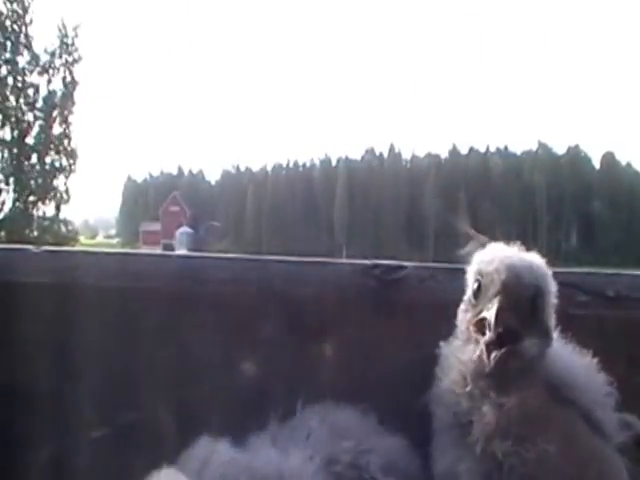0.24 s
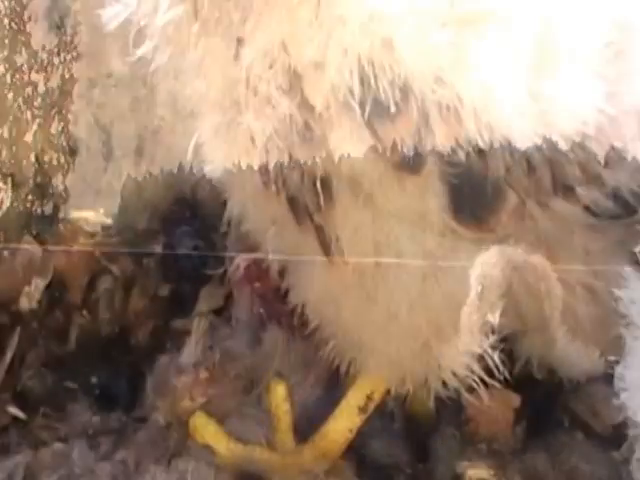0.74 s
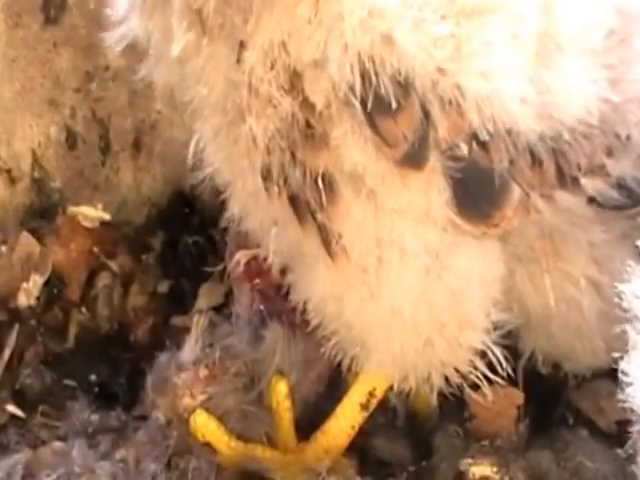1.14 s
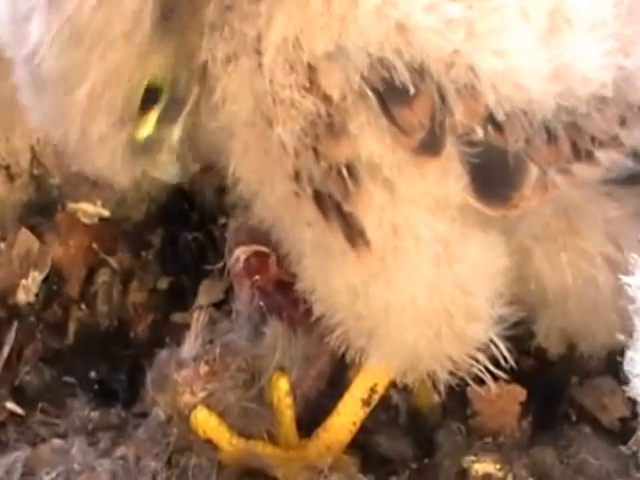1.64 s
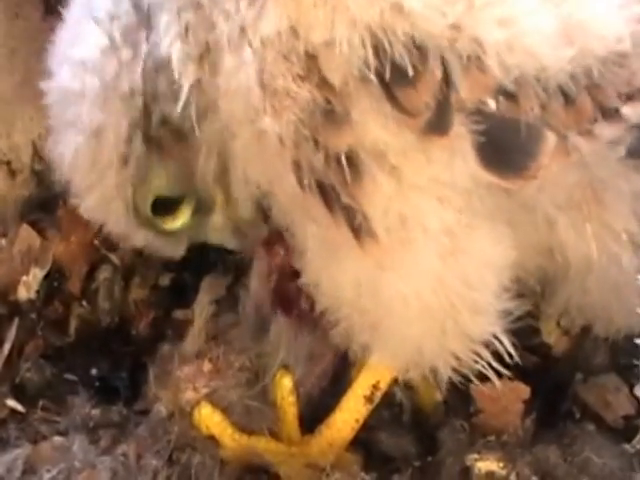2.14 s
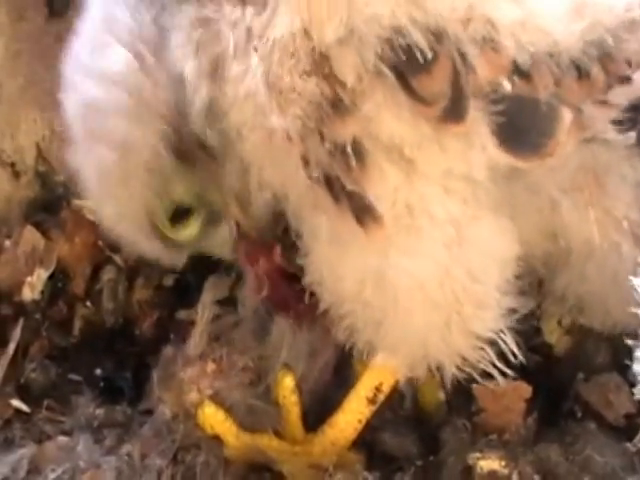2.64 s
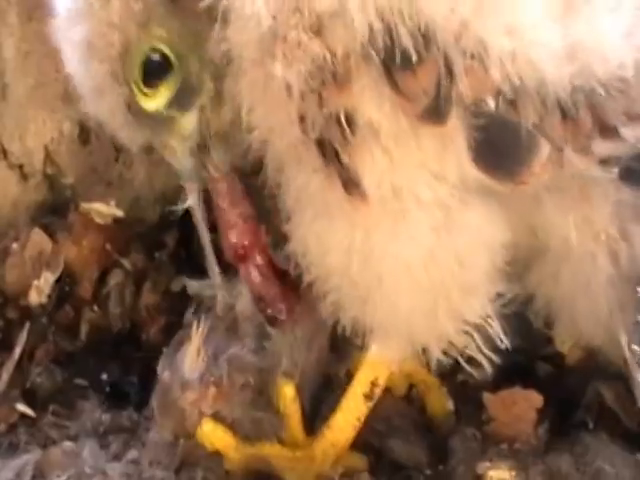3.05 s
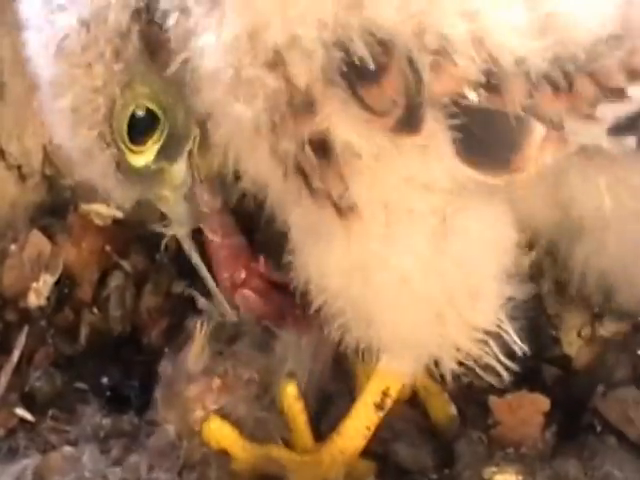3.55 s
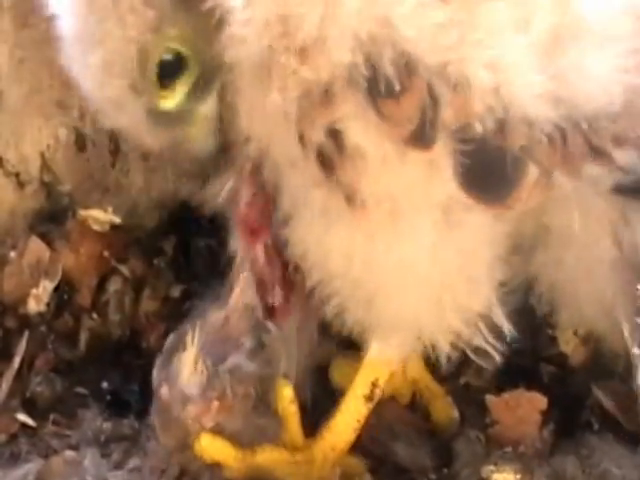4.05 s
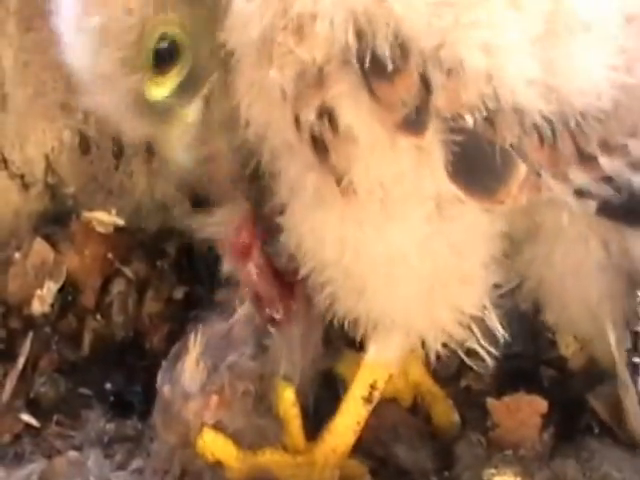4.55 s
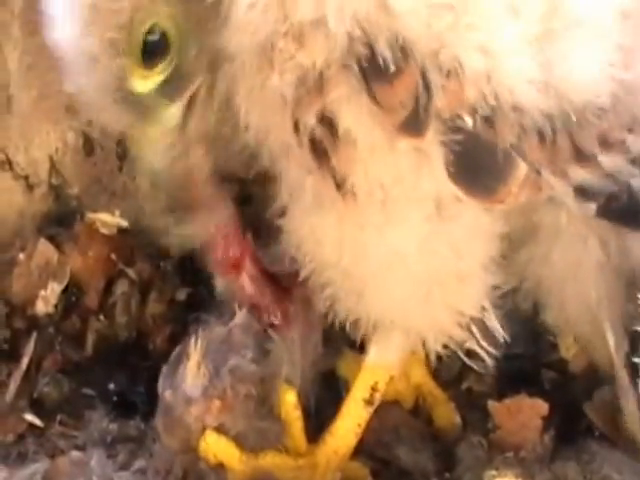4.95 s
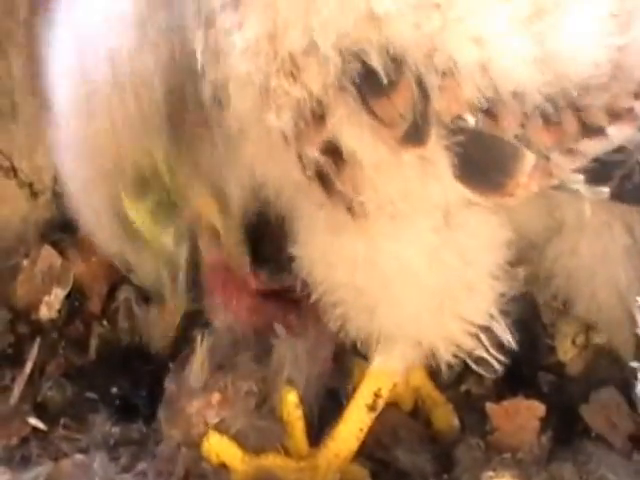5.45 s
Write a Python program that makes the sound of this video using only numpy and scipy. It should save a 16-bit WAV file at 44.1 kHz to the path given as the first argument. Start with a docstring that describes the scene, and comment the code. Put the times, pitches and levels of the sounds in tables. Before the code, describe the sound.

Piercing, wavering chick screams pile up, break and end in quick downward yelps, over faint board bumps and a low outdoor rumble.

```python
"""Kestrel chicks beg in a wooden nest box, close to a small camera, while one of them tears at prey.
Three harmonic voices overlap: cries rise, waver, roughen when forced, and may end in a plunging yelp.
Split-period partials and noise make their shared rasp; short wall echoes surround the voices.
Now and then feet bump the boards (damped modes) and litter scrapes (resonant grains).
Shaped noise makes a faint outdoor rumble."""
import sys
import numpy as np
from scipy import signal
from scipy.fft import rfft, irfft
from scipy.io import wavfile
from scipy.ndimage import uniform_filter1d

SR = 44100
rng = np.random.default_rng(int(sys.argv[2]) if len(sys.argv) > 2 else 0)


def dump(signal):
    """Clip the signal to [-1, 1] and save it as 16-bit WAV at the path in sys.argv[1]."""
    limited = np.clip(np.atleast_2d(signal).T, -1, 1)
    pcm = np.round(limited * 32767).astype(np.int16)
    wavfile.write(sys.argv[1], SR, pcm)


N = 251370
TIME = np.arange(N) / SR  # s


def undb(db):
    """Level to amplitude: 20 dB is a factor of ten."""
    return 10 ** (np.asarray(db) / 20)


def unit(x):
    """Normalisation to an rms of 1."""
    return x / np.sqrt(np.mean(x ** 2))


def gain_at(hz, points):
    """Frequency response: (Hz, dB) points joined on a logarithmic frequency axis."""
    point_hz, point_db = np.transpose(points)
    return undb(np.interp(np.log(hz + 1), np.log(point_hz), point_db))


def colour(x, points):
    """Linear filtering: multiply the spectrum by a response, then set the rms to 1."""
    response = gain_at(np.arange(N // 2 + 1) * SR / N, points)
    return unit(irfft(rfft(x) * response, N))


def noise(points):
    """Coloured noise: white noise through a frequency response."""
    return colour(rng.standard_normal(N), points)


def flutter(hz, size):
    """Random modulation: noise low-passed at hz, with a spread of about 1."""
    low_pass = signal.butter(2, hz, fs=SR, output="sos")
    motion = signal.sosfilt(low_pass, rng.standard_normal(size + SR // 2))
    return unit(motion[-size - SR // 4:])[-size:]  # the filter's start is dropped


def place(x, pan_db):
    """Stereo level difference: pan_db is left minus right."""
    return x * undb(np.array([[pan_db], [-pan_db]]) / 2)


# Spectrum of the outdoor background. Each row: frequency in Hz, relative level in dB.
OUTDOOR_SPECTRUM = [(25, -9.5), (65, 2), (120, 0), (190, -4), (330, -16), (700, -23), (1500, -25),
                    (6000, -24), (14000, -34.5)]
# Breeze outside the box, before its random swell. Each row: time in seconds, level in dB.
BREEZE_LEVEL = [(0, -51.5), (1.3, -55.5), (3.8, -51.5), (5.7, -51.5)]


def outdoors(side_db=2, swell_db=2):
    """Partial coherence: moving air rumbles unevenly, mostly unrelated at the two microphones."""
    mid = noise(OUTDOOR_SPECTRUM)
    side = undb(side_db) * noise(OUTDOOR_SPECTRUM)
    level_db = np.interp(TIME, *np.transpose(BREEZE_LEVEL)) + swell_db * flutter(5, N)
    return np.array([mid + side, mid - side]) * undb(level_db)


# Claws and beak in the litter.
# Each row: centre in seconds, length in seconds, level in dB before gain_db, resonance in Hz.
LITTER_STROKES = [(0.19, 0.03, -48, 330), (0.486, 0.059, -52, 925), (1.714, 0.026, -49, 370),
                  (4.242, 0.036, -46.5, 1150), (4.31, 0.08, -49, 330), (4.353, 0.12, -52, 1008),
                  (4.54, 0.035, -42.5, 400), (4.704, 0.26, -52, 392), (5.603, 0.14, -57.5, 706)]


def scrapes(grain=0.98, gain_db=-2):
    """Stick-slip friction: dry litter gives short, grainy strokes, each through one resonance."""
    out = 0
    for centre, length, db, hz in LITTER_STROKES:
        stroke = np.exp(-(2 * (TIME - centre) / length) ** 2)
        grains = rng.standard_normal(N) * np.exp(grain * flutter(154, N))
        resonance = signal.iirpeak(hz, 2.5, fs=SR)
        out = out + undb(db + gain_db) * stroke * unit(signal.lfilter(*resonance, grains))
    return out


# Modes of the floor boards.
# Each row: frequency in Hz, relative level in dB, time to decay by 60 dB in seconds.
BOARD_MODES = [(154, -5.5, 0.24), (187, 9, .12), (234, -22, 0.05), (352, -18, 0.02)]
# Feet and prey on the floor. Each row: start in seconds, peak level in dB before gain_db.
FLOOR_BUMPS = [(0.186, -29), (0.364, -31.5), (0.542, -26), (0.619, -31), (0.776, -34), (1.706, -34.5),
               (3.966, -29), (4.236, -29), (4.37, -30)]


def bumps(gain_db=-4.5, push_s=0.0046):
    """Modal ringing: a soft, scuffing push excites the damped modes of the boards."""
    t = TIME[:SR // 4]
    ring = sum(undb(db) * np.cos(2 * np.pi * hz * t) * undb(-60 * t / t60) for hz, db, t60 in BOARD_MODES)
    out = np.zeros(N + len(t))
    for s, db in FLOOR_BUMPS:
        push = np.exp(-t / push_s) * flutter(434, len(t))
        thud = signal.fftconvolve(push, ring)[:len(t)]
        start = int(s * SR)
        out[start:start + len(t)] += undb(db + gain_db) * thud / np.abs(thud).max()
    return out[:N]


def walls(x):
    """First reflections: the nearest boards answer at different delays at each microphone."""
    lags_s, loss_db = [(.00043, .0017), (.00084, .0024)], -17
    ears = [sum(np.pad(x, (int(lag * SR), 0))[:N] for lag in ear) for ear in lags_s]
    return undb(loss_db) * np.array(ears)


def box(x, t60=0.027, wet_db=-12):
    """Reverberation: close wooden walls give a dense, very short tail, different at each microphone."""
    t = TIME[:SR // 8]
    tails = rng.standard_normal((2, len(t))) * undb(-60 * t / t60) * (t > .001)
    return undb(wet_db) * np.array([signal.fftconvolve(x, h / np.linalg.norm(h))[:N] for h in tails])


def rasp_level(smooth_s=.008):
    """Energy summation: the rasp powers of all cries add; the result is in dB."""
    power = np.full(N, 1e-9)
    for cry in BEGGING_CRIES:
        span, _, db = gesture(*cry)
        power[span] += undb(db) ** 2
    return 10 * np.log10(uniform_filter1d(power, size=max(int(smooth_s * SR), 1)))


def croak(pitch_hz, jitter, effort):
    """Subharmonics: a strained syrinx's period splits in three, giving a ladder of wavering partials."""
    glide, rise, split_db, flicker_db = .03, .15, -4, 5
    # less pressure, lower pitch
    lift = 1 + rise * (uniform_filter1d(effort, size=4410) - 1)
    hz = pitch_hz * lift * (1 + glide * flutter(5, N) + jitter * flutter(330, N))
    phase = 2 * np.pi * np.cumsum(hz) / SR
    out = 0
    for k in range(4, 14):  # thirds of the pitch
        between_harmonics = k % 3 > 0
        db = split_db * between_harmonics + flicker_db * np.tanh(flutter(25, N))
        out = out + undb(db) * np.sin(k / 3 * phase + rng.uniform(0, 2 * np.pi))
    return unit(out)


# Colour of the screech. Each row: frequency in Hz, relative level in dB.
RASP_SPECTRUM = [(350, -27), (750, -10), (1450, -14.5), (2050, -1.5), (2750, 0.5), (3400, 2), (4100, 3.5),
                 (4800, -4.5), (5500, -2), (6300, 2), (7250, 3), (8900, -11), (11800, -19), (13800, -34)]


def screech(rattle_hz=380, rattle_depth=0.39, unevenness=.35):
    """Nonlinear phonation: the brood's reedy undervoice gains noise and rattle with effort."""
    forced_db, jitter, chaos = -30, .024, .42  # level of full effort; pitch shake and noise power there
    level_db = rasp_level()
    effort = np.clip(undb(level_db - forced_db), .2, 1)
    reeds = croak(2850, jitter * effort, effort) + croak(3300, jitter * effort, effort)
    voiced = colour(reeds, RASP_SPECTRUM)
    share = chaos * effort
    mixed = np.sqrt(1 - share) * voiced + np.sqrt(share) * noise(RASP_SPECTRUM)
    cycle = 2 * np.pi * np.cumsum(rattle_hz * (1 + unevenness * flutter(201.9, N))) / SR
    bursts = np.exp(effort * (rattle_depth * np.sin(cycle) + 0.19 * flutter(45, N)))
    return unit(mixed * bursts) * undb(level_db)


# A squeal: from top to low note, way up, hold, way back (s).
SWOOP_S, LEAP_S, NOTE_S, RECOVER_S = .038, .02, .008, .028
LEAP_DROP_DB, LEAP_ROUGH, NOTE_ROUGH = 4.5, .75, .12  # loss at the top; roughness at top and low note
BREAK_DB, BREAK_AT_S, BREAK_S = 7, .058, .01  # falter on the way up: loss, lead on the low note, width


def with_squeal(course, t, top_hz, low_hz, tone_db, over_db):
    """Register break: the voice falters, leaps to a rough top and swoops to a clear note at t = 0."""
    high = np.sin(np.pi / 2 * t / SWOOP_S) ** 2
    loss_db = LEAP_DROP_DB * high
    hz = low_hz + (top_hz - low_hz) * high
    rough = NOTE_ROUGH + (LEAP_ROUGH - NOTE_ROUGH) * high ** 2
    squeal = np.array([hz, tone_db - loss_db, over_db - loss_db, rough])
    share = np.interp(t, [-SWOOP_S - LEAP_S, -SWOOP_S, NOTE_S, NOTE_S + RECOVER_S], [0, 1, 1, 0])
    falter_db = BREAK_DB * np.exp(-((t + BREAK_AT_S) / BREAK_S) ** 2)
    return course + share * (squeal - course) - np.outer([0, 1, 1, 0], falter_db)


YELP_ATTACK, YELP_HOLD, YELP_FADE_DB = .6, .75, 9  # shares of the yelp's length; loss at its end
YELP_CRACK_DB, YELP_CRACK_AT, YELP_CRACK_WIDTH = 7, .3, .2  # early dip: loss, then shares of the length


def with_yelp(course, fall, final_hz, tone_db, over_db, rough=.22):
    """Tension release: the pitch plunges exponentially to final_hz as fall runs from 0 to 1."""
    hz = course[0] * (final_hz / course[0]) ** fall
    fade_db = YELP_FADE_DB * np.interp(fall, [YELP_HOLD, 1], [0, 1])
    yelp = np.array([tone_db - fade_db, over_db - fade_db, np.full(len(fall), rough)])
    crack_db = YELP_CRACK_DB * np.exp(-((fall - YELP_CRACK_AT) / YELP_CRACK_WIDTH) ** 2)
    share = np.minimum(fall / YELP_ATTACK, 1)
    strengths = course[1:] - np.outer([1, 1, 0], crack_db) + share * (yelp - course[1:])
    return np.vstack([hz, strengths])


ARCH = 2.2  # power of the arch that pitch and effort follow on both sides of the crest
SAG_DB, RASP_SAG_DB = 3, 3  # lost between crest and close
RASP_SWELL = .9  # share of a cry's swell that its rasp follows
SOFT_ROUGH = .5  # share of the roughness that is gone at the soft ends of a cry
YELP_RASP_DB = -10  # change of the rasp over the yelp
RELEASE_SHARE, RELEASE_DB = .22, 14  # a cry without a yelp fades over its last part
# Trembling of the voices. Each entry: voice, rate in Hz.
TREMBLE_HZ = {"shrill": 12.2, "low": 12, "whining": 10}
# Forced voices that break. Each row: voice, time of the low note in seconds, top pitch in Hz,
# low pitch in Hz, then tone and overtone levels in dB before the voice's gain.
VOICE_BREAKS = [("low", .285, 4130, 3520, -29, -34), ("low", .38, 4050, 3580, -31, -31),
                ("shrill", .452, 5050, 4400, -22.5, -42), ("shrill", .514, 5300, 3750, -28, -44),
                ("shrill", .6, 5400, 4200, -23, -36), ("shrill", .745, 4600, 3650, -23, -26),
                ("shrill", 1.345, 4950, 4400, -25, -44), ("shrill", 1.706, 4750, 4350, -23, -46),
                ("shrill", 1.793, 4600, 4350, -23, -42), ("shrill", 1.872, 4680, 4150, -20, -40),
                ("shrill", 1.968, 4950, 4050, -26, -42), ("shrill", 2.968, 4800, 4350, -28, -48),
                ("shrill", 3.043, 4850, 4130, -22, -50), ("shrill", 3.122, 5000, 4220, -19.5, -48),
                ("shrill", 3.2, 5050, 4380, -23, -44), ("shrill", 3.275, 5050, 4200, -19, -50),
                ("shrill", 3.588, 5100, 4850, -29, -50), ("shrill", 3.662, 5350, 4450, -28, -54),
                ("shrill", 3.742, 5150, 4450, -25, -50), ("shrill", 3.813, 5200, 4000, -19, -35),
                ("shrill", 3.892, 5050, 3960, -18.5, -34), ("shrill", 3.972, 4950, 4170, -20, -37),
                ("shrill", 4.055, 4850, 4080, -23, -38), ("shrill", 4.395, 4930, 4120, -24, -42),
                ("shrill", 4.472, 4650, 4030, -24, -38), ("shrill", 4.556, 4450, 4100, -25, -42)]


def gesture(voice, start, crest, end, onset_hz, crest_hz, closing_hz,
            swell_db, tone_db, over_db, rasp_db, rough, quaver, yelp):
    """Motor control: one effort arch steers pitch, tone, overtones, roughness and rasp together."""
    span = (TIME > start) & (TIME < end)
    t = TIME[span]
    close = end - yelp[0] if yelp else end
    # both are 0 at the crest and 1 at the soft end
    rise = np.clip((crest - t) / (crest - start), 0, 1) ** ARCH
    sag = np.clip((t - crest) / max(close - crest, .001), 0, 1) ** ARCH
    hz = crest_hz + (onset_hz - crest_hz) * rise + (closing_hz - crest_hz) * sag
    hz = hz * (1 + quaver * np.cos(2 * np.pi * TREMBLE_HZ[voice] * (t - crest)))
    effort_db = -swell_db * rise - SAG_DB * sag
    roughness = rough * (1 - SOFT_ROUGH * np.maximum(rise, sag))
    course = np.array([hz, tone_db + effort_db, over_db + effort_db, roughness])
    rasp = rasp_db - RASP_SWELL * swell_db * rise - RASP_SAG_DB * sag
    for who, s, *squeal in VOICE_BREAKS:
        if who == voice and start + SWOOP_S < s < end:
            course = with_squeal(course, t - s, *squeal)
    if yelp:
        fall = np.clip((t - close) / yelp[0], 0, 1)
        course = with_yelp(course, fall, *yelp[1:])
        rasp = rasp + YELP_RASP_DB * fall
    else:
        release = np.clip(1 - (end - t) / (RELEASE_SHARE * (end - start)), 0, 1)
        course = course - np.outer([0, 1, 1, 0], RELEASE_DB * release ** 2)
    return span, course, rasp


# How throat and open beak pass the overtones. Each row: frequency in Hz, relative level in dB.
THROAT_RESPONSE = [(3000, 21), (4300, 1.5), (5200, 17), (6400, 8), (7500, 5.5), (9000, -4), (12700, -20),
                   (14500, -32)]


def call(span, course, jitter, jitter_hz, shimmer, shimmer_hz, waver, side_db, side_hz):
    """Source and filter: the syrinx whistles a harmonic tone that shakes with roughness."""
    edge_s = 0.003
    t = TIME[span]
    size = len(t)
    hz, tone_db, over_db, rough = uniform_filter1d(course, size=150, axis=1)
    rough = np.clip(rough, 0, 1)
    # the tone weakens while the pitch moves fast (octaves a second)
    plunge = np.abs(np.gradient(np.log2(hz))) * SR
    hold = 1 / np.sqrt(1 + (plunge / 70) ** 2)
    hz = hz * (1 + waver * flutter(33.4, size) + jitter * rough * flutter(jitter_hz, size))
    phase = 2 * np.pi * np.cumsum(hz) / SR
    orders = np.arange(2, 7)[:, None]
    below_nyquist = orders * hz < SR / 2
    weights = gain_at(orders * hz, THROAT_RESPONSE) * orders ** -.7 * below_nyquist
    overtones = (weights * np.sin(orders * phase)).sum(0) / np.sqrt((weights ** 2).sum(0))
    depth = shimmer * rough
    shake = np.exp(depth * np.tanh(flutter(shimmer_hz, size)) - depth ** 2 / 3 + .15 * flutter(52, size))
    # the other side of the syrinx beats against the tone and sets side bands around every partial
    beat_hz = side_hz * (1 + 0.12 * flutter(13, size) + 0.303 * rough * flutter(380, size))
    beat = 2 * np.pi * np.cumsum(beat_hz) / SR
    shake = shake * (1 + undb(side_db) * np.sin(beat))
    fade = np.sin(np.pi / 2 * np.clip(np.minimum(t - t[0], t[-1] - t) / edge_s, 0, 1))
    whistle = undb(tone_db) * np.sin(phase) + undb(over_db) * overtones
    out = np.zeros(N)
    out[span] = np.sqrt(2) * fade * hold * shake * whistle
    return out


# Cries that swell to a crest, sag, and either fade or plunge in a yelp.
# Each row: voice, start, crest and end in seconds, onset, crest and closing pitch in Hz, swell in dB,
# tone, overtone and rasp levels in dB before later gains, roughness from 0 to 1, quaver as a share
# of pitch, and the yelp: None or length in seconds, final pitch in Hz, tone and overtone levels in dB.
BEGGING_CRIES = [ ("shrill", -.2, .42, .603, 4500, 4800, 4600, 6, -34, -56, -34, .55, .02, (.025, 1850, -28, -32)),
                 ("shrill", .672, .715, .759, 3950, 4500, 3700, 12, -30, -36, -34, .4, 0, (.013, 1850, -25, -29)),
                 ("shrill", .765, .87, 1.2, 3900, 4730, 4780, 10, -28.5, -62, -34, .3, .006, None),
                 ("shrill", 1.1, 1.3, 1.393, 4720, 4850, 4050, 3, -28, -56, -33, .65, .006, (.019, 1800, -33, -45)),
                 ("shrill", 1.488, 1.75, 1.879, 3600, 4560, 4200, 11, -26, -55, -33.5, .3, .012, (.018, 1900, -28, -36)),
                 ("shrill", 1.868, 1.925, 2.005, 4350, 4600, 3900, 0, -34, -50, -38, .3, 0, (.02, 1900, -37, -38)),
                 ("shrill", 2.06, 2.17, 2.32, 3750, 4150, 4220, 3, -28, -46, -39, .1, .008, None),
                 ("shrill", 2.29, 2.43, 2.591, 4300, 4540, 4480, 1, -23, -57, -33, .26, .012, (.033, 1900, -29, -31)),
                 ("shrill", 2.74, 3.17, 3.33, 3650, 4600, 3900, 11, -27, -52, -33, .45, .008, (.014, 2300, -36, -38)),
                 ("shrill", 3.455, 3.55, 3.7, 3650, 4800, 4800, 14, -34, -57, -37.5, .65, .02, None),
                 ("shrill", 3.66, 3.93, 4.075, 4700, 4800, 4300, 4, -28, -50, -29.5, .55, 0, (.024, 2050, -28, -23)),
                 ("shrill", 4.07, 4.098, 4.13, 4400, 5400, 4700, 7, -23, -50, -30, .6, 0, (.018, 2700, -38, -40)),
                 ("shrill", 4.12, 4.34, 4.595, 4500, 4850, 4150, 0, -44, -60, -37, .6, .005, None),
                 ("shrill", 4.59, 4.68, 4.793, 4200, 4350, 4250, 9, -39, -68, -36, .6, .008, (.027, 1800, -32, -46)),
                 ("shrill", 4.975, 5.04, 5.12, 3200, 3820, 3900, 6, -32, -62, -45, .05, 0, None),
                 ("shrill", 5.11, 5.17, 5.23, 3850, 4200, 3950, 6, -37, -62, -45, .1, 0, None),
                 ("shrill", 5.26, 5.535, 5.678, 3850, 3920, 3800, 5, -31.5, -46, -50, .08, .03, (.027, 1850, -34, -46)),
                 ("low", -.1, .25, .4, 3650, 3850, 3650, 4, -37, -47, -40, .35, .025, None),
                 ("low", .492, .505, .52, 4000, 3680, 3550, 14, -31, -23, -27, .35, 0, None),
                 ("low", .638, .653, .672, 3750, 3430, 3500, 10, -27, -42, -31, .3, 0, None),
                 ("low", .76, 1.2, 1.345, 2680, 2950, 2950, 2, -48, -43, -42, .35, .015, (.02, 1900, -39, -44)),
                 ("low", 1.477, 1.482, 1.489, 1930, 2050, 1950, 2, -34, -34, -55, .05, 0, None),
                 ("low", 1.486, 1.52, 1.65, 2620, 2720, 2780, 0, -42, -54, -45, .2, .005, None),
                 ("low", 2.01, 2.19, 2.34, 2600, 2700, 2450, 0, -46, -46, -40, .35, .005, None),
                 ("low", 2.58, 2.76, 2.83, 2250, 2250, 2200, 2, -52, -62, -65, .15, .005, (.03, 1700, -47, -58)),
                 ("low", 2.726, 2.732, 2.742, 1950, 2020, 2050, 2, -39, -41, -52, .05, 0, None),
                 ("low", 2.738, 2.78, 2.88, 2620, 2730, 2850, 0, -42, -58, -43, .15, .005, None),
                 ("low", 2.87, 3.2, 3.367, 3120, 3380, 3250, 6, -37, -48, -39, .25, .012, (.026, 1500, -39, -48)),
                 ("low", 4.37, 4.53, 4.569, 2850, 2960, 3000, 2, -38, -51, -43, .2, .035, (.019, 2050, -30, -18)),
                 ("low", 4.566, 4.581, 4.59, 2120, 2080, 1970, 5, -36, -27, -32, .2, 0, None),
                 ("low", 4.58, 4.64, 4.75, 2050, 2100, 2050, 0, -49, -50, -46, .25, .025, None),
                 ("low", 4.742, 4.84, 4.903, 2480, 2680, 2600, 2, -39, -37, -36, .25, .02, (.032, 1700, -34, -19)),
                 ("low", 4.94, 5.21, 5.546, 2080, 2080, 1980, 8, -52, -47, -44, .2, .028, (.018, 1700, -41, -44)),
                 ("low", 5.59, 5.645, 5.72, 2900, 3520, 3600, 10, -34, -48, -46, .08, 0, None),
                 ("whining", -.1, .45, .64, 3400, 3450, 3420, 0, -34, -34, -39, .25, .02, None),
                 ("whining", .605, .72, 1.03, 3500, 3580, 3460, 0, -38, -44, -41, .2, .006, None),
                 ("whining", .98, 1.3, 1.35, 3300, 3380, 3550, 4, -34, -30, -44, .2, .012, None),
                 ("whining", 1.33, 1.385, 1.462, 3550, 3720, 3400, 0, -34, -68, -80, 0, 0, None),
                 ("whining", 1.52, 1.6, 1.93, 3450, 3520, 3280, 0, -36, -38, -42, .22, .01, None),
                 ("whining", 1.92, 2.04, 2.093, 3280, 3460, 3280, 5, -33, -35, -40, .13, 0, (.026, 1700, -40, -38)),
                 ("whining", 2.24, 2.42, 2.673, 3700, 3320, 3170, 6, -37, -36, -39, .22, .008, (.026, 1560, -26, -31)),
                 ("whining", 3.34, 3.4, 3.48, 3200, 3150, 3300, 0, -58, -62, -53, .4, .02, None),
                 ("whining", 3.47, 3.75, 4.1, 3300, 3520, 3480, 10, -38, -38, -40, .4, .008, None),
                 ("whining", 4.08, 4.4, 4.456, 3450, 3340, 3250, 0, -36, -32, -37.5, .28, .015, (.022, 1680, -28, -24)),
                 ("whining", 4.81, 4.855, 4.91, 3620, 3580, 3200, 8, -32, -42, -44, .12, 0, None),
                 ("whining", 4.9, 5.063, 5.244, 3200, 3170, 2950, 5, -34, -30, -52, .1, .03, (.021, 1680, -28, -23)),
                 ("whining", 5.245, 5.33, 5.43, 3300, 3380, 3450, 6, -54, -35, -37.5, .12, .012, (.035, 1900, -42, -40)),
                 ("whining", 5.4, 5.44, 5.63, 3430, 3400, 3250, 0, -40, -36, -46, .12, .025, None),
                 ("whining", 5.18, 5.22, 5.64, 3050, 2850, 2720, 0, -39, -44, -50, .3, .015, None),
                 ("whining", 5.57, 5.67, 5.74, 2750, 3100, 2900, 8, -35, -45, -40, .08, 0, None)]


def chick(name, gain_db, **voice):
    """Superposition: the cries of one voice add up."""
    return undb(gain_db) * sum(call(*gesture(*cry)[:2], **voice) for cry in BEGGING_CRIES if cry[0] == name)


def scene():
    """Direct and reflected sound: voices and floor in the box, over open air."""
    shrill = chick("shrill", gain_db=-2, jitter=0.066, jitter_hz=454, shimmer=0.93, shimmer_hz=307,
                   waver=0.00373, side_db=-24, side_hz=824)
    low = chick("low", gain_db=1, jitter=.04, jitter_hz=394, shimmer=1.9, shimmer_hz=205,
                waver=0.0061, side_db=-18.5, side_hz=604)
    whine = chick("whining", gain_db=-2.5, jitter=0.0316, jitter_hz=400, shimmer=2.7, shimmer_hz=153,
                  waver=0.00405, side_db=-21, side_hz=700)
    rasp = screech()
    brood = place(shrill, -1.9) + place(low, -1.8) + place(whine, 0.17) + place(rasp, -1.3)
    voices = shrill + low + whine + rasp
    floor = bumps() + scrapes()
    echo = walls(voices) + box(voices) + box(floor, wet_db=-4)
    return brood + echo + place(floor, 0.66) + place(outdoors(), 2.24)


def record(dry):
    """Band limiting: the camera cuts the top with a steep elliptic low-pass."""
    top_hz = 13700
    return signal.sosfilt(signal.ellip(8, .2, 70, top_hz, fs=SR, output="sos"), dry)


dry = scene()
out = record(dry)
dump(out)
```